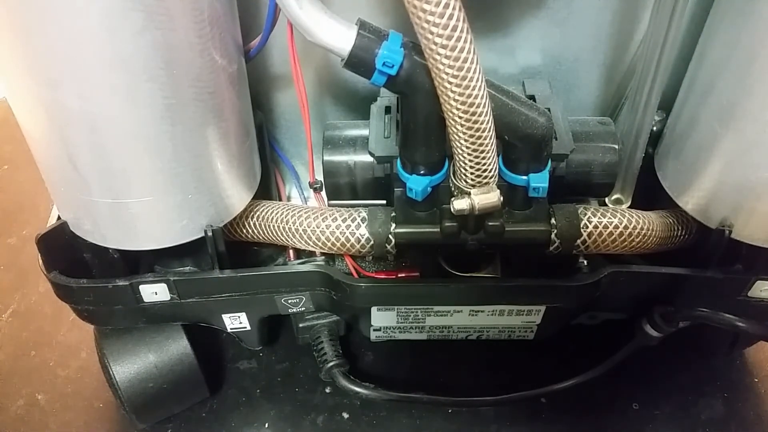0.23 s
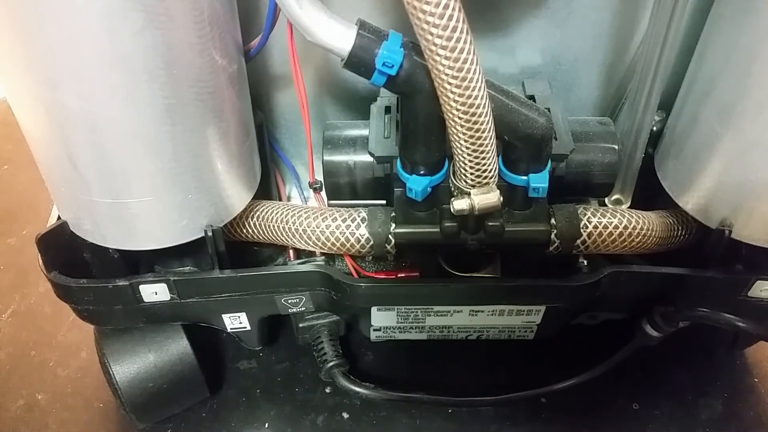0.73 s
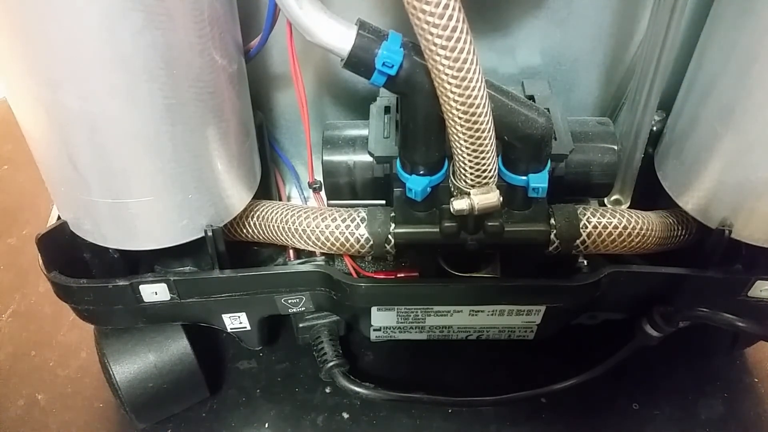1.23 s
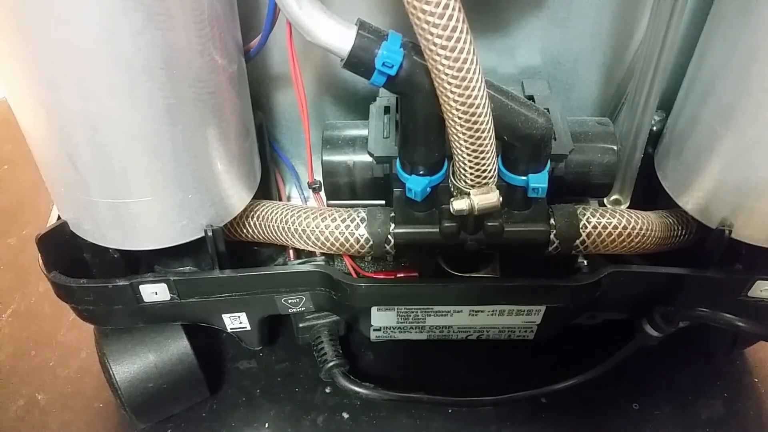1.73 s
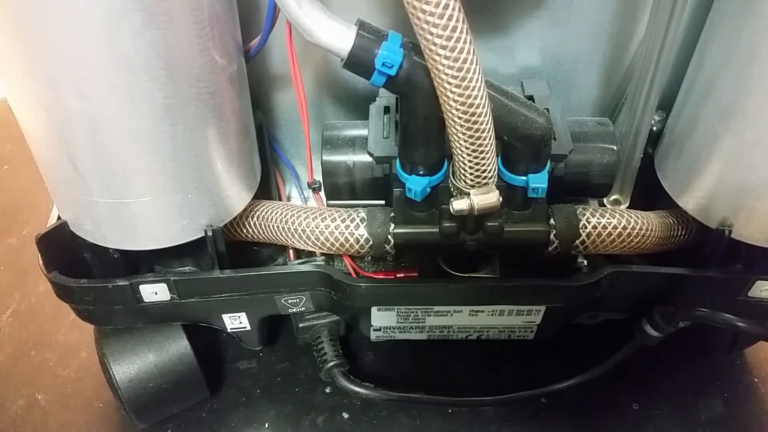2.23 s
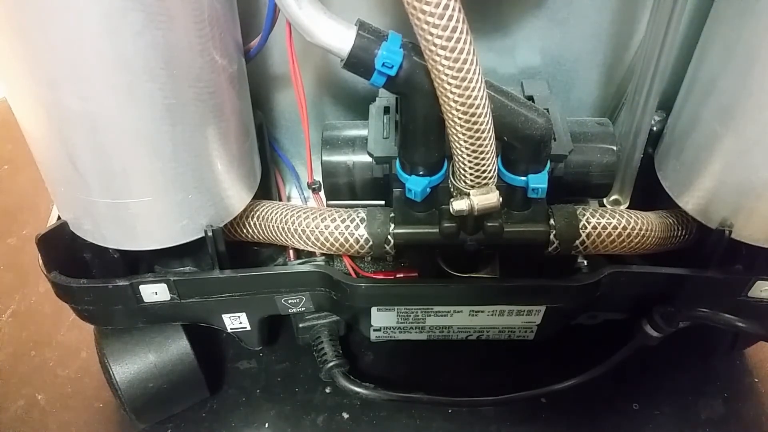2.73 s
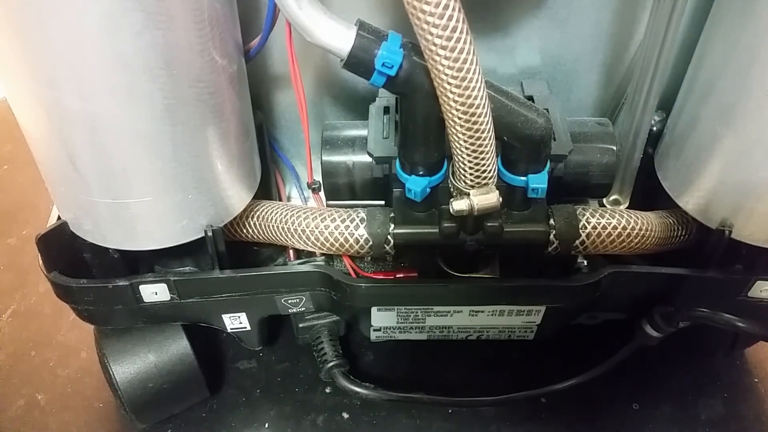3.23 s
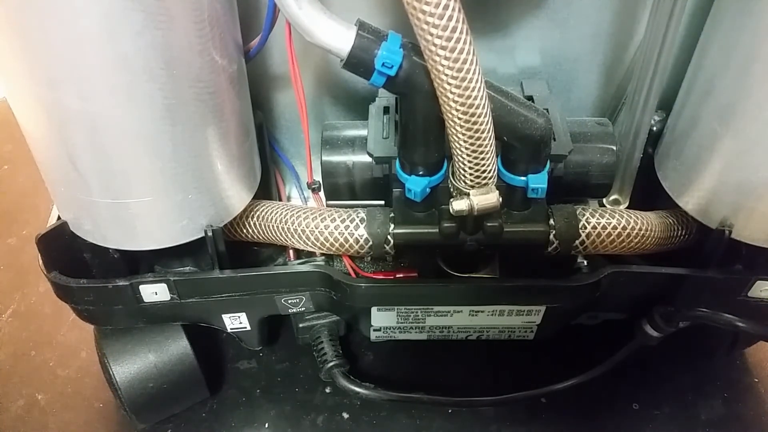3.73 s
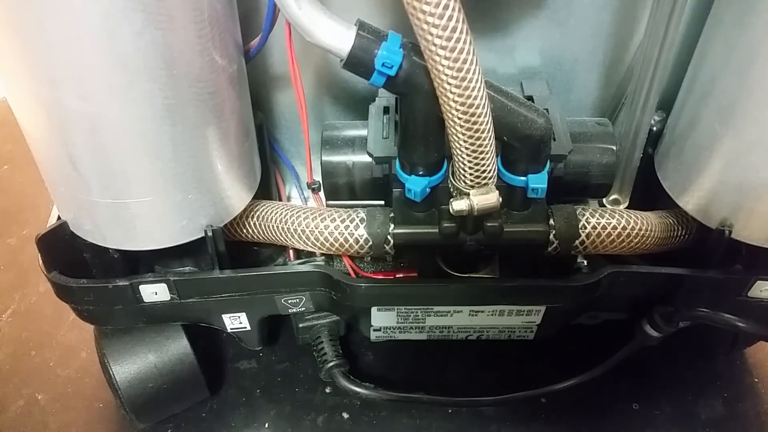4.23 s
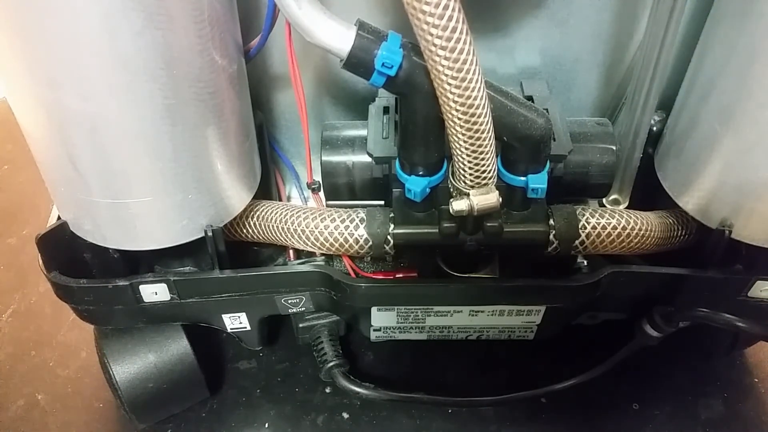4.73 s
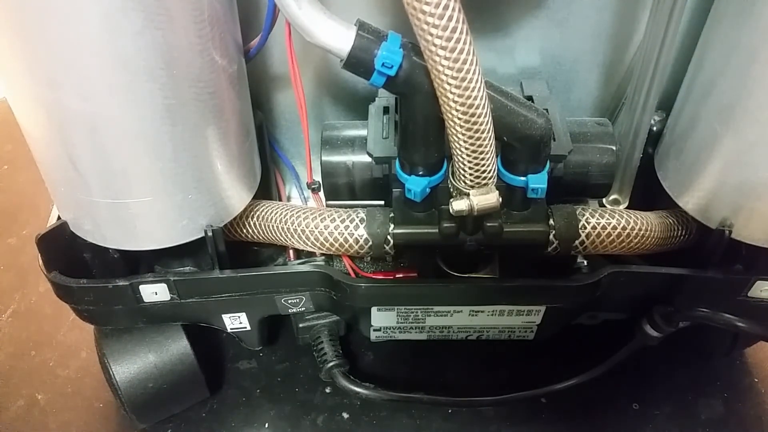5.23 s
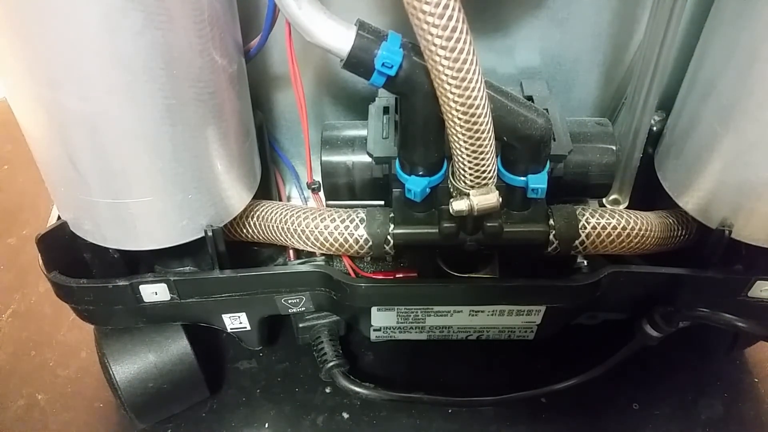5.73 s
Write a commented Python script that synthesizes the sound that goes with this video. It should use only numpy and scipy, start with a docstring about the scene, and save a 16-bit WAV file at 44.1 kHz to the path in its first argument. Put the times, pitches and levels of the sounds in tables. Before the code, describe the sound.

Inside an open machine cabinet indoors, a small twin-piston compressor throbs fast and low with rattling housing and fan whir. A fine hiss leads to a double spit of air, a dull thump and a gush fading to a sigh. A small puff follows, and near the end a metallic click starts another hiss. Close stereo microphones.

```python
"""An oxygen concentrator indoors, cabinet open, a stereo pair of microphones close by.
Throughout, a twin-piston compressor throbs and slows as it fills a sieve bed, its strokes rattle the housing
and a fan whirs. A cracked valve seat hisses at first; then air spits across to the other bed, the full bed
gushes and sighs through a muffler, the surge thumps and the relieved motor picks up.
Later a small puff escapes, and near the end a valve clicks and a seat hisses again."""
import sys
import numpy as np
from scipy import signal
from scipy.fft import rfft, irfft
from scipy.io import wavfile

SR = 44100
rng = np.random.default_rng(int(sys.argv[2]) if len(sys.argv) > 2 else 0)


def store_pcm(level_fs):
    """Save levels as 16-bit WAV."""
    pcm = np.round(np.clip(level_fs, -1, 1) * 32767).astype(np.int16)
    wavfile.write(sys.argv[1], SR, np.atleast_2d(pcm).T)


N = 263718
TIME, FREQ = np.arange(N) / SR, np.maximum(np.fft.rfftfreq(N, 1 / SR), 1)


def undb(db):
    """Decibels to gain."""
    return 10 ** (np.asarray(db) / 20)


def unit(x):
    """Scale to rms 1."""
    return x / np.sqrt(np.mean(x ** 2))


def over_hz(rows):
    """Rows (frequency [Hz], value) joined on a log-frequency axis."""
    hz, value = np.transpose(rows)
    return np.interp(np.log(FREQ), np.log(hz), value)


def pan(db):
    """Left and right gains for a left-minus-right level difference."""
    return undb(np.array([[db], [-db]]) / 2)


def resonance(hz, width):
    """Complex response of one mode, gain 1 at its centre."""
    detuning = FREQ / hz - hz / FREQ
    return 1 / (1 + 1j * detuning * hz / width)


def shape(x, response):
    """Filter by a frequency response."""
    return irfft(rfft(x) * response, N)


def walk(rate):
    """Slow chance with spread near 1: random levels, 2 * rate a second, joined by straight lines."""
    return 1.2 * np.interp(2 * rate * TIME, np.arange(2048), rng.standard_normal(2048))


def noise(response):
    """Coloured diffuse noise of rms 1 at two microphones, most alike in the low mids, little in the treble."""
    # likeness of the two channels: (frequency [Hz], correlation [-1 to 1])
    channel_likeness = [(150, 0.27), (350, 0.82), (700, 0.62), (1400, 0), (2800, 0.042), (8000, 0.048),
                        (13000, 0.13)]
    alike = np.clip(over_hz(channel_likeness), -.99, .99)
    mid = shape(rng.standard_normal(N), np.sqrt(1 + alike))
    side = shape(rng.standard_normal(N), np.sqrt(1 - alike))
    return unit(shape(np.array([mid + side, mid - side]), response))


def duct(spectrum, modes):
    """Colour of a hiss lifted, in power, by the resonances of the duct it runs through."""
    lift = 0
    for hz, width, db, pan_db in modes:
        lift = lift + np.abs(undb(db) * pan(pan_db) * resonance(hz, width)) ** 2
    return undb(over_hz(spectrum)) * np.sqrt(1 + lift)


def decay(start, t60, rise=0.00049):
    """Straight rise and exponential fall by 60 dB in t60; times in seconds."""
    age = np.maximum(TIME - start, 0)
    return np.minimum(age / rise, 1) * np.exp(-np.log(1000) * np.minimum(age / t60, 20))


def jet(start, length, db, attack, fall_db_per_s):
    """Flow through a valve: it opens, holds until its length is over, then dies away."""
    age = TIME - start
    return np.clip(age / attack, 0, 1) * undb(db - fall_db_per_s * np.maximum(age - length, 0))


def rush(flow, colour, pan_db):
    """Turbulent hiss whose level follows its flow, with a slight flicker."""
    flicker_db = .5 * walk(60)
    return noise(colour) * flow * undb(flicker_db) * pan(pan_db)


def compressor():
    """Shaft turns and pressure (1 = full bed): the motor slows as a bed fills and picks up at the swap."""
    switch_s, cycle_s, collapse_s, fill_s = .78, 6.5, .06, 7.0
    # motor speed [turns/s]: unloaded, lost at full pressure, brief overshoot when relieved
    free_hz, sag_hz, overshoot_hz, settle_s = 24.2744, .6025, .8833, .08
    first_stroke_s = .0267

    def fill(since):
        """Pressure climbs like a filling tank, to 1 after one cycle."""
        return np.expm1(-np.maximum(since, 0) / fill_s) / np.expm1(-cycle_s / fill_s)

    age = TIME - switch_s
    swapped = np.clip(age / collapse_s, 0, 1)
    pressure = (1 - swapped) * fill(age + cycle_s) + swapped * fill(age)
    overshoot = overshoot_hz * swapped * np.exp(-np.maximum(age, 0) / settle_s)
    speed = free_hz - sag_hz * pressure + overshoot
    return np.cumsum(speed) / SR - first_stroke_s * speed[0], pressure


def air(turns, pressure, db=-35.0, load_db=-1, pulse_db=1.1, pulse_lag=0.38, flicker_db=0.81):
    """Air rushes through fan and hoses, swelling with every stroke and thinning as the pressure builds."""
    # plain hiss: (frequency [Hz], relative density [dB])
    air_colour = [(25, -26), (70, -3), (150, 2.5), (212, 2), (265, 0.5), (385, -10), (510, -5.5),
                  (800, -8.5), (1250, -11.5), (1500, -15), (5200, -19), (6000, -18.5), (9500, -18.5),
                  (14500, -18)]
    # hose and manifold modes: (frequency [Hz], width [Hz], level over plain hiss [dB], left minus right [dB])
    hose_modes = [(2954, 230, 4.5, 2.5), (3290, 93, 9.5, -6.5), (4583, 157, 10.5, -5), (5120, 680, 3, -6.5),
                  (6940, 290, 0.5, 9), (8250, 490, -18, 41)]
    pulse = np.cos(4 * np.pi * (turns - pulse_lag))  # twice a turn
    swell_db = pulse_db * pulse + flicker_db * walk(16)
    level = undb(db + load_db * (pressure - .5) + swell_db)
    return noise(duct(air_colour, hose_modes)) * level * pan(-0.6)


def fan(waver_rad=0.33, flutter_db=2.2):
    """Steady-pitched fan tones that waver in level and phase in the draught."""
    # (frequency [Hz], rms level before flutter [dB])
    fan_tones = [(212.6, -51.5), (425.3, -46), (1061, -61.5)]
    tones = 0
    for hz, tone_db in fan_tones:
        level = undb(tone_db + flutter_db * walk(10))
        tones = tones + level * np.sin(2 * np.pi * hz * TIME + waver_rad * walk(2.5))
    return np.sqrt(2) * tones


def seat(pressure, attack_s=0.027, fall_db_per_s=200, weep_db=-49, weep_empty_db=-40):
    """A valve seat weeps more as the pressure builds and hisses finely once it is cracked open."""
    # hiss colour: (frequency [Hz], relative density [dB])
    seat_colour = [(1000, -18), (2000, 9), (4000, 1), (7000, 6), (9500, 1), (12000, 4), (13300, 7),
                   (13900, 4), (14500, -20)]
    # openings: (start [s], length [s], level [dB])
    seat_openings = [(-.1, .8, -40.5), (5.437, .6, -42.5)]
    opened = sum(jet(start, length, db, attack_s, fall_db_per_s) for start, length, db in seat_openings)
    weep = undb(weep_db + weep_empty_db * (1 - pressure))
    return rush(np.maximum(opened, weep), undb(over_hz(seat_colour)), pan_db=-0.5)


def puffs():
    """Trapped air escapes from the pipes in brief bursts of resonant noise."""
    # (time [s], level [dB], frequency [Hz], width [Hz], 60 dB decay [s])
    pipe_puffs = [(0.706, -26, 1300, 3000, 0.022), (2.42, -29, 3750, 1100, 0.078),
                  (2.4205, -35, 2970, 700, 0.06)]
    out = 0
    for start, db, hz, width, t60 in pipe_puffs:
        out = out + undb(db) * noise(resonance(hz, width) ** 2) * decay(start, t60)
    return out * pan(-1.5)


def thumps():
    """The pressure surge rings the beds and the muffler briefly; each ring builds over one cycle."""
    # (time [s], level [dB], frequency [Hz], 60 dB decay [s])
    surge_thumps = [(0.79, -30, 173, 0.1), (0.8062, -20.5, 474, 0.042), (0.8104, -20, 117, 0.18)]
    out = 0
    for start, db, hz, t60 in surge_thumps:
        ring = np.sin(2 * np.pi * hz * (TIME - start))
        out = out + undb(db) * ring * decay(start, t60, rise=1 / hz)
    return out


def clicks(tail_db=-20, tail_hz=12100, tail_width_hz=2000, tail_t60_s=0.26, lag_s=0.000148,
           snap_db=-11, snap_hz=10000, snap_width_hz=9000, snap_t60_s=.008):
    """The solenoid plunger snaps onto its seat and bounces; a bright ring lingers in the cabinet."""
    # plunger hits and bounces: (time [s], level [dB], left minus right [dB])
    plunger_hits = [(5.4408, -10, -2.5), (5.4421, -17, -2.5), (5.4442, -21, 6)]
    # valve ring: (frequency [Hz], level within a hit [dB], 60 dB decay [s])
    valve_modes = [(2830, -21, .012), (4600, -23, 0.011), (7930, -12, 0.013), (9450, -8, .007),
                   (10750, -9, .007), (11680, 1, 0.0063), (12050, 5, 0.0072), (13100, -5, .007),
                   (14200, -10, .007)]
    out = 0
    for start, db, pan_db in plunger_hits:
        age = TIME - start - np.array([[lag_s], [0]])  # the right microphone is nearer
        ring = 0
        for hz, mode_db, t60 in valve_modes:
            ring = ring + undb(mode_db) * decay(start, t60) * np.sin(2 * np.pi * hz * age)
        snap = noise(resonance(snap_hz, snap_width_hz)) * decay(start, snap_t60_s, rise=.0001)
        tail = noise(resonance(tail_hz, tail_width_hz) ** 2) * decay(start, tail_t60_s)
        hit = undb(snap_db) * snap + ring + undb(tail_db) * tail
        out = out + undb(db) * hit * pan(pan_db)
    return out


def spit(attack_s=.004, fall_db_per_s=290):
    """Air spits across from one bed to the other in two quick turbulent surges."""
    # hiss colour: (frequency [Hz], relative density [dB])
    spit_colour = [(1200, -17), (2100, -3.5), (2600, -12), (4600, -3), (6200, -6), (9800, -3), (11000, 0),
                   (12200, 2), (13200, 4), (14500, -3.5)]
    # surges: (start [s], length [s], level [dB])
    spit_surges = [(0.702, 0.057, -25.5), (0.771, 0.032, -26)]
    surges = [jet(start, length, db, attack_s, fall_db_per_s) for start, length, db in spit_surges]
    return rush(np.max(surges, axis=0), undb(over_hz(spit_colour)), pan_db=-1.0)


def vent(attack_s=0.025, gush_fall_db_per_s=136, sigh_db=-31, sigh_fall_db_per_s=10):
    """The full bed gushes into the muffler, then sighs ever more softly as it empties."""
    # plain hiss: (frequency [Hz], relative density [dB])
    vent_colour = [(300, -2), (1200, 1), (2200, 6.5), (5800, 2.5), (7400, 1.5), (10500, 4.5), (14500, -2)]
    # muffler modes: (frequency [Hz], width [Hz], level over plain hiss [dB], left minus right [dB])
    muffler_modes = [(4550, 62, 9.5, -7), (6790, 230, 13, 0), (7480, 380, 6.5, 14.5), (8800, 220, 5, 6),
                     (9650, 160, 1, 6), (11930, 280, 7, 2), (13700, 290, 12.5, -2)]
    # first gush: (start [s], length [s], level [dB])
    first_gush = (.777, 0.028, -29)
    start, length, gush_db = first_gush
    gush = jet(start, length, gush_db, attack_s, gush_fall_db_per_s)
    sigh = jet(start, length, sigh_db, attack_s, sigh_fall_db_per_s)
    return rush(np.hypot(gush, sigh), duct(vent_colour, muffler_modes), pan_db=-0.5)


def rattle(turns, pressure, lead_turns=.38, weak_db=-3, scatter_db=2, jitter_s=0.00011, loose=1.0):
    """Strokes knock the housing a little before their air pulses; pressure sets how much each part chatters."""
    # housing modes: (frequency [Hz], width [Hz], level at reference pressure [dB], reference pressure
    # [1 = full bed], loss one full pressure away [dB], left minus right [dB])
    housing_modes = [(537, 62, -42, 1.0, 202, 0.5), (725, 88, -56.5, 0.15, 37, -4),
                     (1133.5, 14, -47, 0.27, 21.5, -5), (1273.4, 16.4, -47.5, 0.46, 26.5, 1.5),
                     (1801, 41, -56, 0.31, 10, 9), (2354, 11, -60, 0.54, -1, 1.5),
                     (3300, 140, -55.5, .5, 25, -1)]
    strokes = np.arange(1, int(2 * turns[-1]))
    chance = rng.standard_normal((len(strokes), 2))
    when = np.interp(strokes / 2 - lead_turns, turns, TIME) + jitter_s * chance[:, 0]
    place = np.clip(when * SR, 0, N - 1).astype(int)
    knocks = np.zeros(N)
    knocks[place] = undb(weak_db * (strokes % 2) + scatter_db * chance[:, 1])  # every other one is weaker
    out = 0
    for hz, width, db, best, fall_db, pan_db in housing_modes:
        mode = resonance(hz, width) * np.abs(resonance(hz, hz / 6))
        ring = unit(unit(shape(knocks, mode)) + loose * noise(mode))  # knocks plus loose buzzing
        out = out + ring * undb(db - fall_db * (pressure - best) ** 2) * pan(pan_db)
    return out


def throb(turns, pressure, db=-29.0, load_db=3, boom_db=7, boom_hz=218, boom_width_hz=24, lag_rad=0.71,
          rough=0.01, clatter_hz=300, clatter_rough=0.4):
    """Two unequal strokes a turn make shaft harmonics; they harden with pressure and the cabinet booms."""
    # (multiple of the motor speed, relative level at full pressure [dB])
    stroke_orders = [(2, -8.5), (3, -28.5), (4, -2.5), (5, -24), (6, -3), (7, -17.5), (8, 2), (9, -6),
                     (10, -10.5), (11, -23), (12, -20), (14, -22), (15, -38), (16, -38), (17, -28.5),
                     (18, -27), (19, -31.5), (20, -27.5), (21, -25.5), (22, -25), (23, -30), (24, -31.5),
                     (25, -30.5), (26, -34), (27, -27), (28, -33), (29, -41), (30, -26)]
    out, turn_hz = 0, turns[-1] / TIME[-1]
    for order, order_db in stroke_orders:
        hz = order * turn_hz
        boom = 1 / (1 + ((hz - boom_hz) / boom_width_hz) ** 2)
        harden_db = load_db * (np.sqrt(pressure) - 1)
        gain = undb(order_db + harden_db + boom_db * boom * (pressure - 1))
        # the low orders add up to a clean pulse; the high ones scatter in the cabinet and waver
        scattered = 1 / (1 + (clatter_hz / hz) ** 10)
        lag = lag_rad * min(hz / boom_hz, 1) ** 2
        phase = 2 * np.pi * (order * turns + scattered * rng.random()) - lag
        waver = 1 + (rough + clatter_rough * scattered) * walk(9)
        # the deepest orders lean to the right
        out = out + gain * np.cos(phase) * waver * pan(np.interp(hz, [70, 270], [-2.3, 0]))
    return np.sqrt(2) * undb(db) * out


def scene():
    """Fan, valves and compressor together, as they reach the microphones."""
    turns, pressure = compressor()
    background = air(turns, pressure) + fan()
    valves = seat(pressure) + puffs() + thumps() + clicks() + spit() + vent()
    return background + valves + rattle(turns, pressure) + throb(turns, pressure)


def record(dry):
    """The recorder cuts the top steeply, above 14520 Hz."""
    return signal.sosfilt(signal.ellip(12, .1, 90, 14520, fs=SR, output="sos"), dry)


dry = scene()
out = record(dry)
store_pcm(out)
```